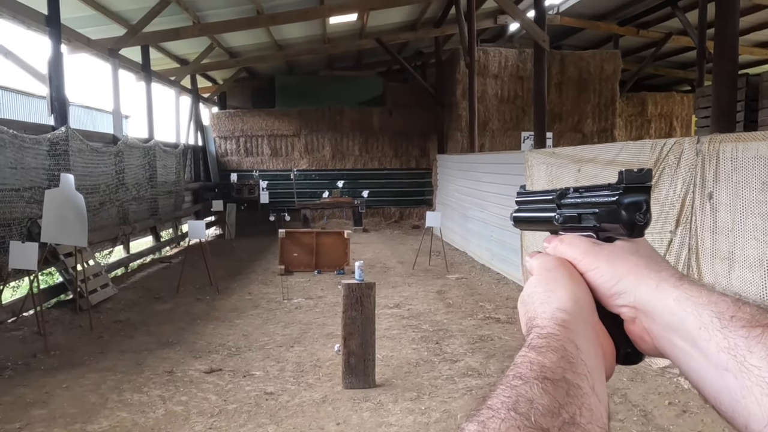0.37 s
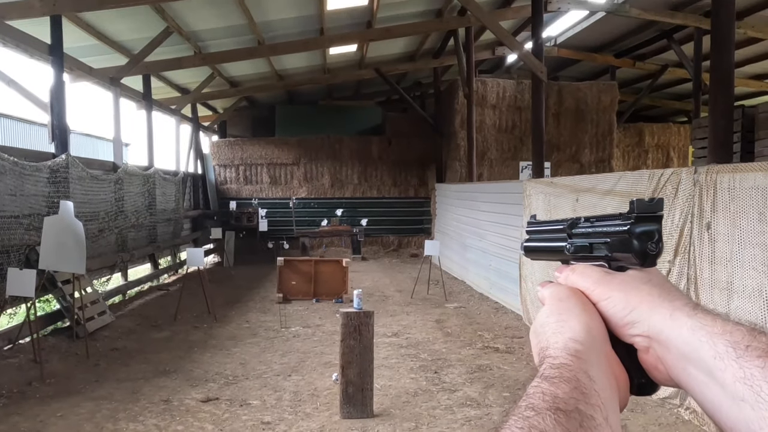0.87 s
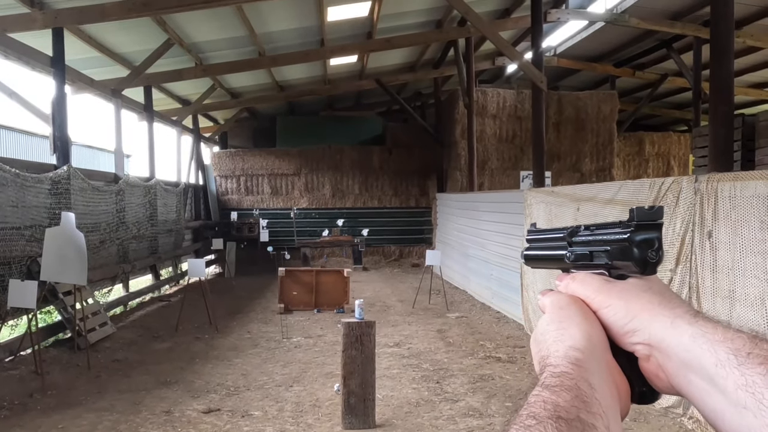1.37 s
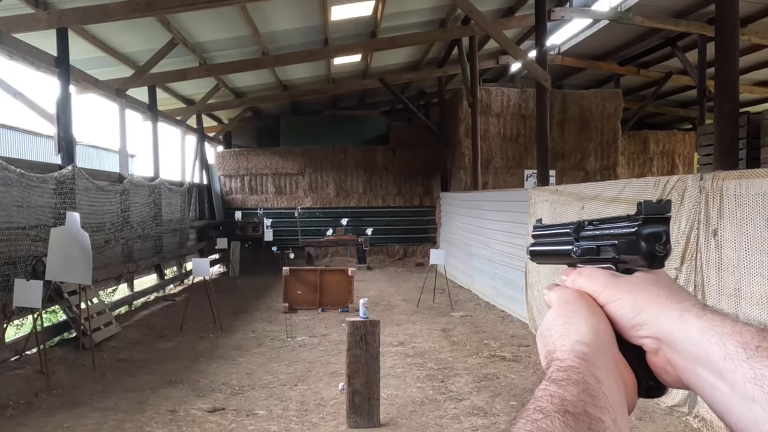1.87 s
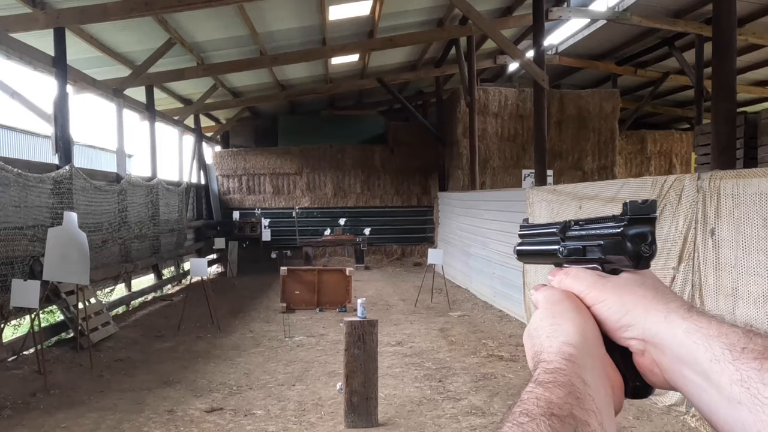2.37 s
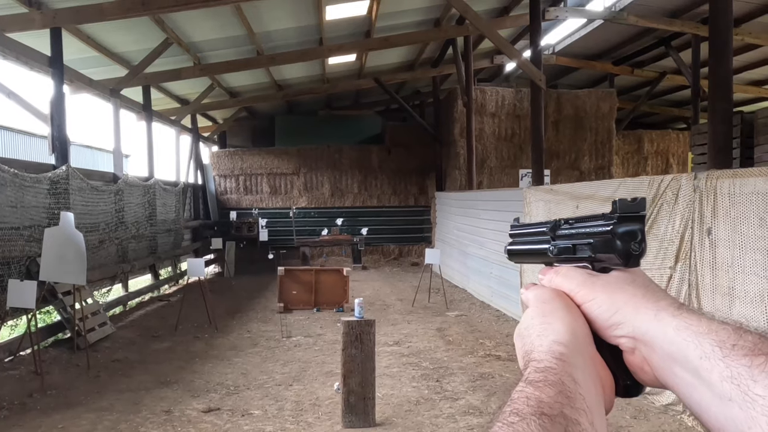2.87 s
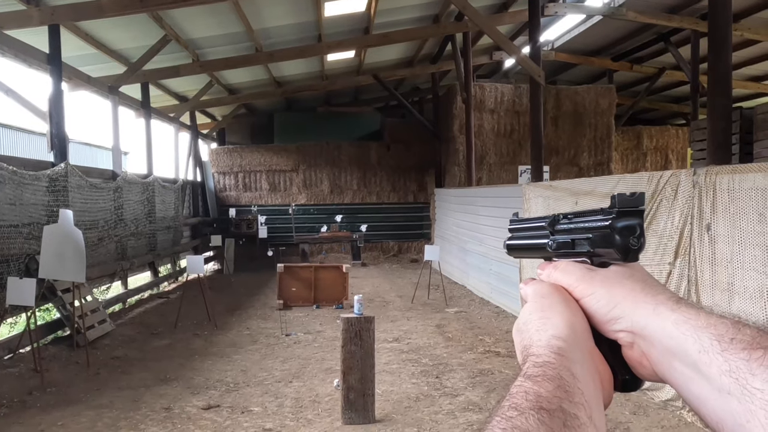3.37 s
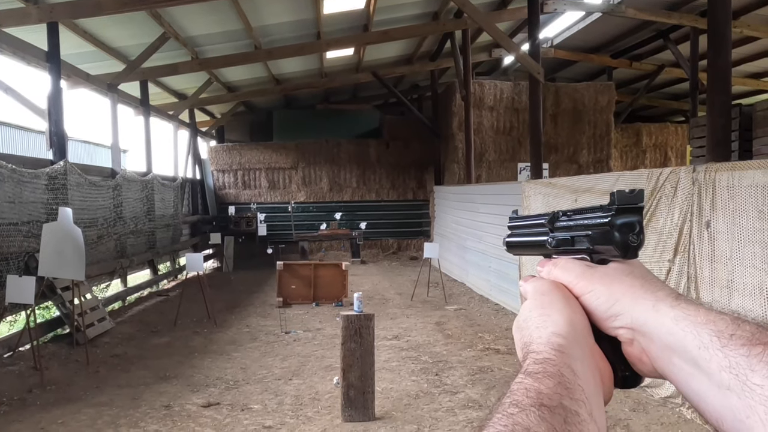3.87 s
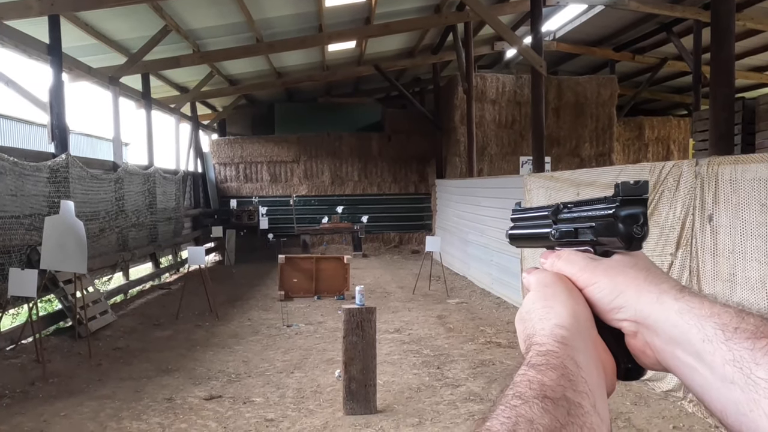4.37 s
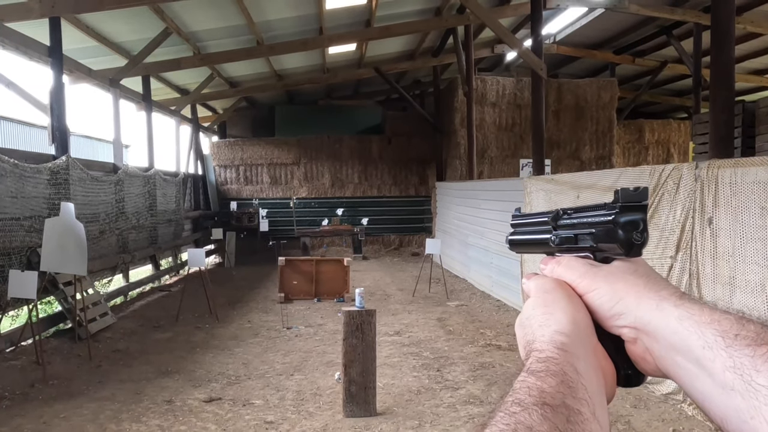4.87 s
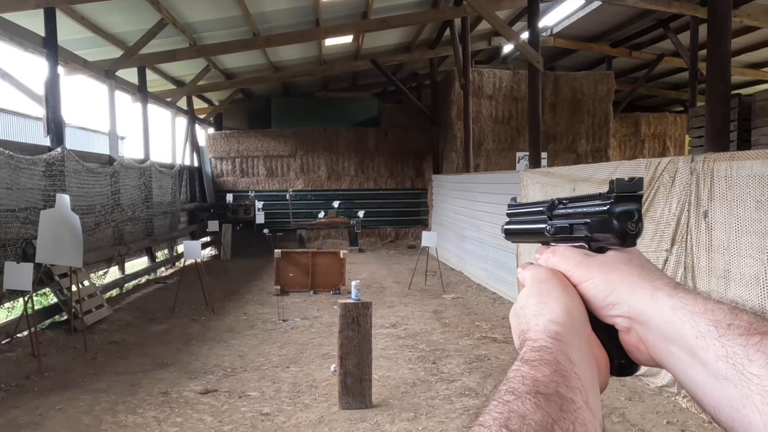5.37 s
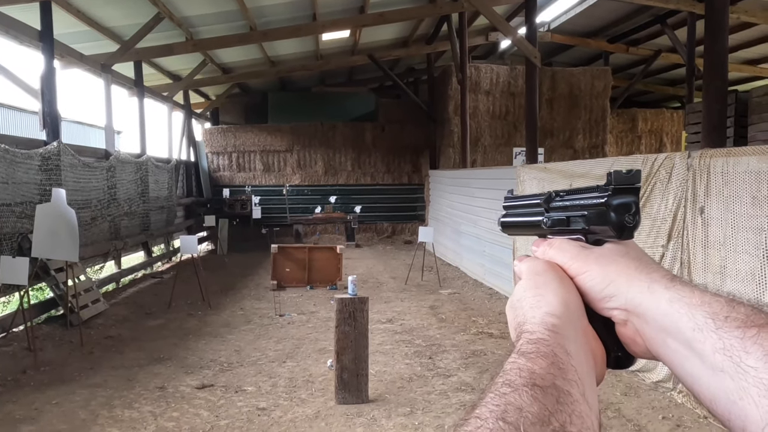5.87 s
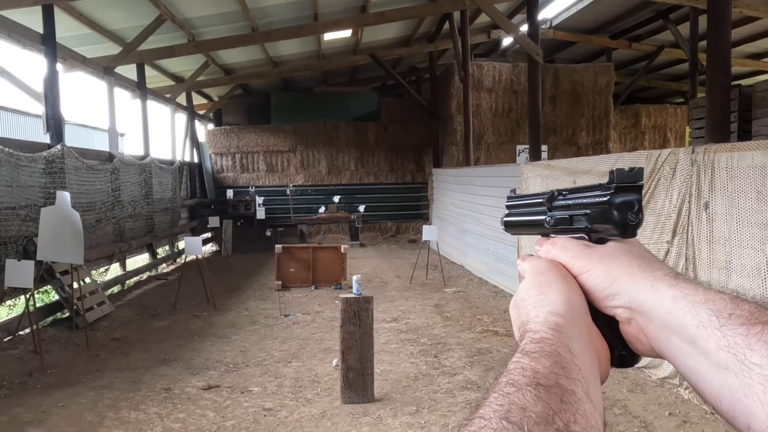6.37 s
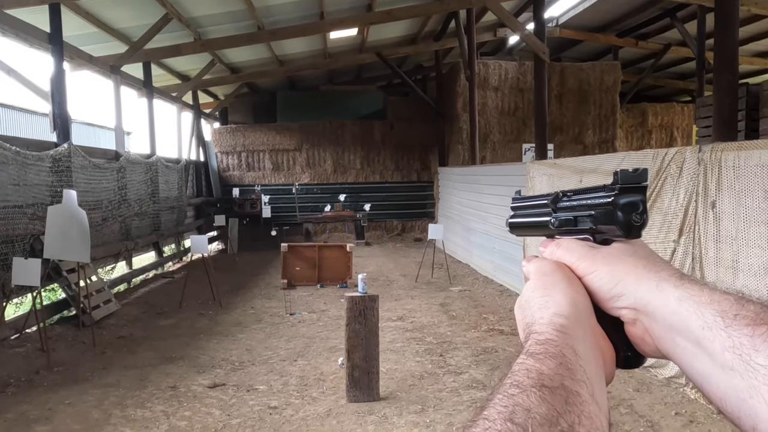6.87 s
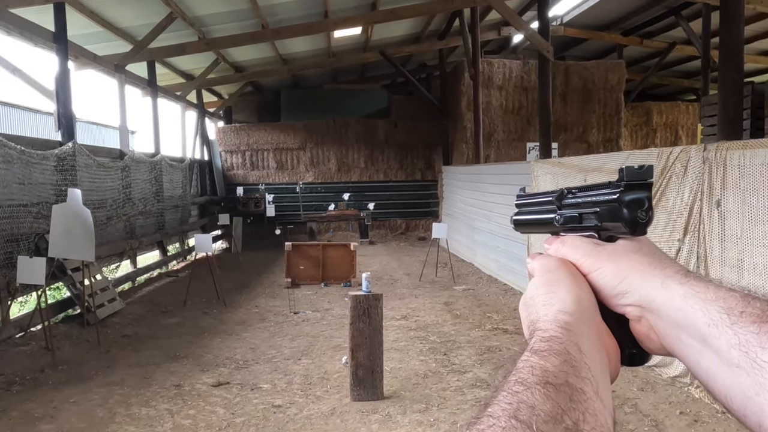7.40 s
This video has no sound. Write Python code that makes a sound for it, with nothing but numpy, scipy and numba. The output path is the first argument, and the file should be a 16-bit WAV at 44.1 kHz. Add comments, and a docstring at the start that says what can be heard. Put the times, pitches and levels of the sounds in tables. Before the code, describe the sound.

Long open barn, microphone right beside a gas pistol. First comes the fading echo of an earlier shot and its pellet hitting steel. Two hard, loud shots follow, near the first quarter and past the middle, each with mechanical slam, short roomy tail and quick clanking steel hit. Three soft far pops and faint plate tinks fall around them. Lumpy low wind rumble and thin air hiss continue to the end.

```python
"""Long open barn, microphone close beside a gas pistol: each near shot's pellet cracks on steel a moment later.
Further off, other pistols pop and plates ring faintly. Blasts and pops are shaped noise, plates are sets
of blurred modes, and the barn answers with decaying noise tails.
Draughts buffet the microphone as lumpy low noise; its gain control ducks on every near shot."""
import sys
import numpy as np
from scipy import signal
from scipy.fft import rfft, irfft, next_fast_len
from scipy.io import wavfile
from scipy.ndimage import uniform_filter1d, map_coordinates
from numba import njit

SR = 44100
rng = np.random.default_rng(int(sys.argv[2]) if len(sys.argv) > 2 else 0)


def bounce(signal):
    """Save signal as a 16-bit WAV file at the path given by the first command-line argument."""
    frames = np.transpose(np.atleast_2d(signal))
    limited = np.clip(frames, -1, 1)
    pcm = np.round(limited * 32767).astype(np.int16)
    wavfile.write(sys.argv[1], SR, pcm)


def boost(x):
    """Linear amplitude factor 10**(x/20) for a level x in decibels (scalar or array-like)."""
    u = np.asarray(x, float) / 20
    return 10 ** u


N = 331323

# Near shots: t/s, blast level/dB (ahead of a gain of 1.62), thump/dB, frame/dB, slide/dB, muzzle snap/dB
NEAR_SHOTS = [(1.7581, -16.5, 0, -13, -9.5, -5), (4.1504, -17, -3, -10, -6.5, 3.5)]
# A shot fired before the start, leaving its echo: t/s, blast level/dB
EARLIER_SHOT = (-0.069, -13.5)
# Spectrum of the near gas blast: f/Hz, level/dB per Hz
BLAST = [(50, -25), (100, -14), (280, -5), (420, -8), (900, -14), (1600, -12), (4200, -15.5), (8000, -19.5),
         (11000, -21.5), (14400, -28), (14900, -60)]
# Low end of a near shot rolling in the barn: f/Hz, level/dB per Hz
BOOM = [(30, -16), (80, 4), (160, -5.5), (300, -13), (700, -26.5), (1200, -59.5)]
BOOM_DB = -18.5  # against the blast

# Pellets on steel: t/s, crack level/dB, echo level/dB, ring level/dB, brightness/dB per octave, plate number
STRIKES = [(0.0755, -13, -36, -33.5, 6, 0), (0.578, -65, -84, -88, 16, 2), (1.919, -16, -31, -30, 2.5, 1),
           (2.862, -68, -60.5, -44.5, 1.5, 5), (2.974, -43, -61.5, -47.5, -7, 2),
           (2.985, -44, -64.5, -56.5, 12.5, 2), (3.1, -62, -79, -65.5, 18, 6),
           (3.528, -72, -61.5, -78, -2, 2), (3.815, -59, -65, -61.5, 1, 3),
           (4.309, -16.5, -37.5, -29, 4.5, 4), (5.16, -62.5, -84.5, -72, 11, 2)]
# Modes of each plate: f/Hz, level/dB, t60/s
PLATES = [
    [(1810, -6, 0.058), (2970, -9, .048), (3820, -3, 0.11), (4860, -2, 0.05), (5980, -4, 0.06),
     (7400, -13.5, .03), (8400, -9, .02), (10500, -6, .03)],
    [(1780, -7, 0.11), (2720, -3, 0.03), (3300, -4, 0.06), (3720, -8, 0.017), (4700, -2, 0.05),
     (5800, -4, 0.06), (6020, -7, .04), (7900, -9, 0.04), (10400, -12, .02)],
    [(1800, -16, .05), (3330, -1, 0.045), (4770, -9, 0.06), (3560, 1, 0.04), (3780, -1, 0.03),
     (5814, -11, .035), (6440, -9, 0.043), (8000, -22, 0.095), (9600, -15, 0.07)],
    [(2350, -17.5, .3), (3190, -3.5, 0.5), (3620, -9, 0.17), (3900, -9.5, .12), (4700, -14, .4),
     (10500, -22, .12), (6600, -21, 0.33)],
    [(1450, -2, 0.035), (1620, 0, 0.045), (1780, -11, 0.22), (2560, -2, 0.03), (2760, 1, 0.025),
     (2920, -4, 0.045), (3770, -6.5, 0.014), (5410, -17.5, 0.014), (6520, -9, 0.07), (6980, -11, 0.04),
     (8960, -11, 0.035), (9400, -12, 0.031)],
    [(1046, -2.5, 0.036), (1770, -5, 0.045), (3400, -8, 0.03), (4900, -11, 0.029), (6200, -13, .025),
     (8400, -11, .02)],
    [(1780, -10, 0.23), (4156, -17, 0.13), (4670, -4, 0.11), (5874, -13, .09), (7484, 0, 0.05),
     (10300, -13, .025), (11500, -17.5, 0.05)],
]
# How much each loose plate blurs its modes: random phase step/radians a sample
RATTLE = [.11, .13, .14, .09, .15, .13, .12]
# Spectrum of pellet on steel, also used for the slide: f/Hz, level/dB per Hz
CRACK = [(500, -30), (1300, -7), (1750, 0.5), (3000, 3.5), (5000, -1.5), (7000, -4), (10000, -11.5),
         (12500, -19), (14500, -27), (14900, -70.5)]
RING_SWELL_S = 0.002  # time constant of a plate ringing up

# Far pistols: t/s, pop level/dB, low end/dB, high end/dB, barrel f/Hz, barrel boost/dB, echo over pop/dB
FAR_POPS = [(0.4783, -40, -17, -3.5, 2208, 7.5, -7), (3.4445, -36, -7, -9.5, 1440, 6, -3),
            (4.858, -36.5, -18, 5.5, 1670, 4.5, -8)]
# Spectrum of a far pop: f/Hz, level/dB per Hz
POP = [(150, -43), (300, 1.5), (560, 1), (870, -7.5), (1100, -3.5), (2400, -2), (3500, -5.5), (7000, -20),
       (10000, -33), (14000, -47.5)]
POP_T60_S = .06

# Faint steady rings: t/s, length/s, f/Hz, level/dB
RINGS = [(0.678, 0.074, 1770, -64), (3.47, 0.13, 499, -52), (3.953, 0.047, 609, -65.5),
         (4.805, 0.037, 1815, -71), (5.099, 0.18, 625, -70), (5.388, .22, 1774, -79.5)]

# Draught at the microphone: t/s, deep buffet level/dB, flutter over the buffet/dB
WIND = [(0, -43, -22), (0.403, -67.5, 0), (0.859, -48, -13.5), (.97, -44, -17), (1.301, -41.5, -13),
        (1.5, -34, -24.5), (1.7, -31, -8), (1.819, -23.5, 0.5), (1.971, -27, -5), (2.24, -50, -11),
        (2.681, -45, -10.5), (2.861, -33, -3.5), (2.96, -44.5, -8), (3.22, -43.5, -3.5), (3.36, -39.5, 3),
        (3.44, -52, -2.5), (3.7, -59, -3.5), (4.451, -52.5, -18), (4.639, -47, -14.5), (5.25, -54, -11.5),
        (5.378, -40, -24.5), (5.631, -45.5, -18), (5.982, -33, -13.5), (6.17, -44.5, -14.5),
        (6.5, -46.5, -11.5), (6.6, -34, -6), (6.869, -31.5, -2), (6.959, -57, 1), (7.131, -33, -13.5),
        (7.3, -43, -2.5), (7.39, -51, -14), (7.51, -38, -10)]
# Spectrum of the deep buffet: f/Hz, level/dB per Hz
DEEP = [(15, -4), (28, 1), (60, -3), (110, -33), (200, -45.5)]
# Spectrum of the flutter: f/Hz, level/dB per Hz
FLUTTER = [(40, -19), (80, 3), (160, -4), (300, -18.5), (500, -35)]
EDDY_DB, EDDIES_PER_S, FLUTTERS_PER_S = 3, 14, 22  # depth and pace of the random lumps

# Spectrum of the outdoor murmur and hiss: f/Hz, level/dB per Hz
AIR = [(150, -25), (300, 0), (600, -9), (1000, -16), (2000, -20), (4000, -26), (6000, -30), (14000, -32),
       (15500, -40)]
AIR_DB = -73.5

# Decay of the barn: f/Hz, t60/s
BARN_DECAY = [(150, 0.4), (500, 0.54), (1500, 0.56), (4000, 0.49), (8000, 0.35), (11000, 0.3), (15000, 0.3)]
# The far end of the barn answers weaker and duller: f/Hz, level/dB
FAR_END = [(300, -22), (1200, -19), (2500, -23), (5000, -40)]
FAR_END_LONGER = 2.1  # times the barn's t60
PATCHY_DB = 2.2  # posts, bales and sheets return uneven patches of echo

# Stereo width: f/Hz, gain of the side signal/dB
WIDTH = [(60, -45), (250, -33), (1000, -25), (2200, -12), (4000, -19), (8000, -16), (10800, -13),
         (12300, 1)]
# The top treble leans left: f/Hz, share of mid put into side
LEAN = [(11000, 0), (12500, .5)]
TOP_HZ = 15600
DUCKED_DB = -10  # the earlier shot has already pushed the gain down


def near_pistol():
    """Noise swells for a few hundredths of a second, gas cracks from the muzzle, then the slide slams back."""
    out, lead = np.zeros((2, N)), .05
    t = np.arange(round(.15 * SR)) / SR - lead
    after = np.maximum(t, 0)
    slam = np.maximum(t - .004, 0)  # the slide arrives 4 ms after the gas
    swell = boost(-6.5 + 60 * t / .05) * (t < 0) * np.clip((t + .045) / .025, 0, 1) ** 2
    gush = (t >= 0) / (1 + (after / .01) ** 6)  # lasts about a hundredth of a second
    u = after / 0.0006
    pulse = (t >= 0) * (1 - u) * np.exp(-u)  # pressure jump, then suction
    slide_shape = boost(-60 * slam / 0.022) * (1 - np.exp(-slam / 0.0025)) / (1 + (slam / 0.024) ** 4)
    for s, db, thump_db, frame_db, slide_db, snap_db in [*NEAR_SHOTS, (*EARLIER_SHOT, -120, -120, -120, -120)]:
        muzzle = filtered(boost(snap_db) * pulse, lambda hz: 1 / (1 + 1j * hz / 3000.0))
        blast = 1.62 * boost(db) * (swell + gush) * noise(len(t), BLAST, tilt_db=-0.5) + muzzle
        thump = -boost(thump_db - 60 * slam / 0.01) * np.sin(2 * np.pi * 108 * slam)
        slide = boost(slide_db) * slide_shape * noise(len(t), CRACK, tilt_db=7.0)
        frame = boost(frame_db - 60 * after / 0.047) * np.sin(2 * np.pi * 280 * after)
        add(out, s - lead, np.array([blast + thump + slide, .4 * slide]))
        add(out, s - lead, in_barn(frame, wet_db=-1.5, build=0.0081))
        add(out, s, answer(db - 11.0, lambda hz: along(BLAST, hz), build=0.055))
        add(out, s, answer(db + BOOM_DB, lambda hz: along(BOOM, hz), build=.01))
    return out


def targets():
    """A rough crack down the barn, its echo, and the loose plate's modes heard mostly through the echoes."""
    out, t = np.zeros((2, N)), np.arange(SR // 2) / SR
    for s, db, echo_db, ring_db, tilt_db, plate in STRIKES:
        hz, level, t60 = np.transpose(PLATES[plate])[:, :, None]
        drift = RATTLE[plate] * np.cumsum(rng.standard_normal((len(hz), len(t))), axis=1)
        modes = boost(level - 60 * t / t60) * np.sin(2 * np.pi * hz * t + drift)
        ring = boost(ring_db) * modes.sum(axis=0) * (1 - np.exp(-t / RING_SWELL_S))
        crack_shape = boost(db - 60 * t / .03) * (1 - np.exp(-t / 0.001))
        crack = crack_shape * noise(len(t), CRACK, tilt_db - 6)
        add(out, s, np.array([crack, .1 * crack]))
        colour_db = lambda f: along(CRACK, f) + tilt_db * np.log2((f + 50) / 3000)
        add(out, s, answer(echo_db, colour_db, build=.014))
        add(out, s, in_barn(ring, wet_db=10.0, build=0.0051))
    return out


def far_pistols():
    """A short swell of noise, a dull pop coloured by the barrel and its copy off the near wall, then echo."""
    out, lead = np.zeros((2, N)), .03
    t = np.arange(round(.09 * SR)) / SR - lead
    rise = boost(-12.0 + 60 * t / 0.04)
    fall = boost(-60 * t / POP_T60_S) * (1 - .4 * np.exp(-np.abs(t) / .001))  # starts 40 % down for about 1 ms
    shape = np.where(t < 0, rise, fall)
    for s, db, low_db, high_db, barrel_hz, barrel_db, echo_db in FAR_POPS:
        shift = [(600, low_db), (1100, 0.007), (4000, 0.0057), (7000, high_db)]
        colour_db = lambda hz: along(shift, hz) + barrel_db / (1 + ((hz - barrel_hz) / 100) ** 2)
        pop = filtered(noise(len(t), POP), lambda hz: boost(colour_db(hz))) * boost(db) * shape
        direct = filtered(pop, lambda hz: 1 / (1 + (hz / 6000) ** 4))
        add(out, s - lead, np.array([direct, 0.085 * direct]))
        add(out, s - lead + .012, .8 * np.array([pop, -.1 * pop]))  # off the near wall
        add(out, s, answer(db + echo_db, lambda hz: along(POP, hz) + colour_db(hz), build=.012))
    return out


def faint_rings():
    """Faint narrow tones that come and go, their phase wandering at random."""
    out = np.zeros((2, N))
    for s, length, hz, db in RINGS:
        t = np.arange(round(length * SR)) / SR
        waver = .045 * np.cumsum(rng.standard_normal(len(t)))
        tone = boost(db) * np.sin(np.pi * t / length) ** 0.12 * np.sin(2 * np.pi * hz * t + waver)
        add(out, s, in_barn(tone, wet_db=-15, build=.01))
    return out


def wind():
    """Eddies at the microphone: lumpy deep pressure, a faster flutter riding on it, nothing in the treble."""
    s, *levels = np.transpose(WIND)
    deep_db, over_db = [np.interp(np.arange(N) / SR, s, c) for c in levels]
    silent = [(1500, -140)]
    deep = unit(noise(N, DEEP + silent) * boost(EDDY_DB * wobble(EDDIES_PER_S)))
    flutter = unit(noise(N, FLUTTER + silent) * boost(EDDY_DB * wobble(FLUTTERS_PER_S)))
    return boost(deep_db) * (deep + boost(over_db) * flutter)


def air():
    """Steady outdoor murmur and hiss: noise that falls away towards the treble."""
    return boost(AIR_DB) * noise(N, AIR)


def side_hiss():
    """Very faint treble hiss, to be laid in opposite phase on left and right."""
    return boost(-99.0) * noise(N, [(9000, -30.5), (12000, -5.0)])


def echo(build):
    """A fresh (mid, side) noise tail of the barn, mid energy 1, building up with time constant build/s."""
    hz, t, z = signal.stft(rng.standard_normal((2, SR)), SR, nperseg=256)
    fall_db = -60 * t / along(BARN_DECAY, hz)[:, None]
    far_end_db = along(FAR_END, hz)[:, None] + fall_db / FAR_END_LONGER
    rough = rng.standard_normal(z.shape[1:])
    patches = unit(uniform_filter1d(uniform_filter1d(rough, size=8, axis=0), size=4, axis=1))
    z = z * boost(PATCHY_DB * patches) * np.hypot(boost(fall_db), boost(far_end_db))
    tail = signal.istft(z, SR, nperseg=256)[1][:, :SR]
    tail = tail * (1 - np.exp(-np.arange(SR) / SR / build))
    return tail / np.linalg.norm(tail[0])


def answer(db, colour_db, build):
    """The barn's answer to a click of some colour; db is its rms level over the first tenth of a second."""
    tail = filtered(echo(build), lambda hz: boost(colour_db(hz)))
    return boost(db) * tail / np.sqrt(np.mean(tail[0, :SR // 10] ** 2))


def in_barn(direct, wet_db, build):
    """A tone straight to the microphone and, by convolution, its echoes."""
    wet = signal.fftconvolve(direct[None], boost(wet_db) * echo(build), axes=1)
    return wet + np.pad([direct, direct * 0], ((0, 0), (0, SR - 1)))


def unit(x):
    """Scaled to rms 1."""
    return x / np.sqrt(np.mean(x ** 2) + 1e-20)


def along(points, hz):
    """(f/Hz, value) points read off on a log axis."""
    f, v = np.transpose(points)
    return np.interp(np.log(hz + 1), np.log(f + 1), v)


def filtered(x, response):
    """x times a response of frequency."""
    m = next_fast_len(x.shape[-1] + 8192)
    return irfft(rfft(x, m) * response(np.fft.rfftfreq(m, 1 / SR)), m)[..., :x.shape[-1]]


def noise(count, spectrum, tilt_db=0):
    """Noise of rms 1 with a spectrum, tilted about 3 kHz by tilt_db per octave."""
    response = lambda hz: boost(along(spectrum, hz) + tilt_db * np.log2((hz + 50) / 3000))
    return unit(filtered(rng.standard_normal(count), response))


def wobble(rate):
    """A smooth random curve, rate knots a second."""
    knots = rng.standard_normal(int(N * rate / SR) + 4)
    return map_coordinates(knots, [np.arange(N) * rate / SR])


def add(track, s, sound):
    """Mixes a (mid, side) sound in from time s."""
    at = np.arange(sound.shape[1]) + round(s * SR)
    inside = (at >= 0) & (at < N)
    track[:, at[inside]] += sound[:, inside]


def scene():
    """Everything is near the middle; the echoes spread a little in the treble."""
    mid, side = near_pistol() + far_pistols() + targets() + faint_rings()
    spread = filtered(side, lambda hz: boost(along(WIDTH, hz)))
    leaning = filtered(mid, lambda hz: along(LEAN, hz))
    side = spread + leaning + side_hiss()
    mid = mid + wind() + air()
    return np.array([mid + side, mid - side])


@njit
def recovering(need_db, start_db, fall_db, climb_db):
    """Gain follows the need downwards quickly and climbs back at a slow steady rate (dB a sample)."""
    gain_db = np.full_like(need_db, start_db)
    for i in range(1, len(need_db)):
        gain_db[i] = max(min(need_db[i], gain_db[i - 1] + climb_db), gain_db[i - 1] - fall_db)
    return gain_db


def low_pass(x):
    """Removes everything above the highest recorded frequency."""
    return signal.sosfilt(signal.butter(12, 15720, fs=SR, output="sos"), x)


def record(dry):
    """Gain control ducks a moment after loud sound and lets go slowly; peaks round off; the top is cut."""
    power = uniform_filter1d((dry ** 2).mean(axis=0), size=441, origin=220)  # over the past 10 ms
    level_db = 10 * np.log10(np.abs(power) + 1e-12)
    need_db = -.8 * np.maximum(level_db + 18.5, 0)
    gain_db = recovering(need_db, DUCKED_DB, 1200 / SR, 75 / SR)  # 1200 dB/s down, 75 dB/s up
    held = dry * boost(gain_db)
    rounded = held / (1 + np.abs(held / .56) ** 4) ** (1 / 4)
    mix = filtered(rounded, lambda hz: hz < TOP_HZ)
    return low_pass(mix)


dry = scene()
out = record(dry)
bounce(out)
```